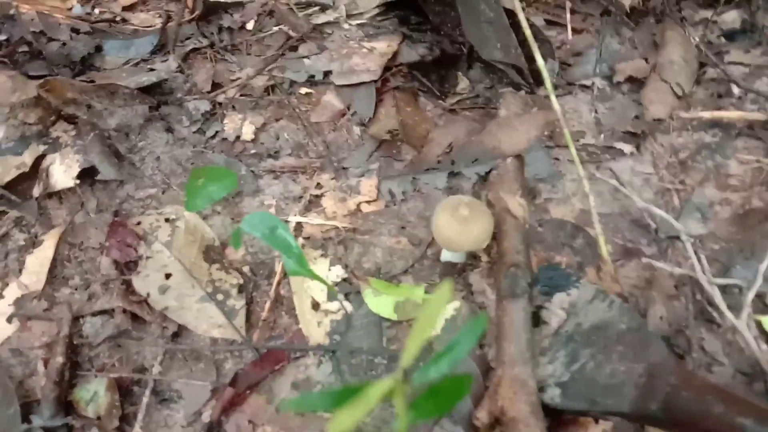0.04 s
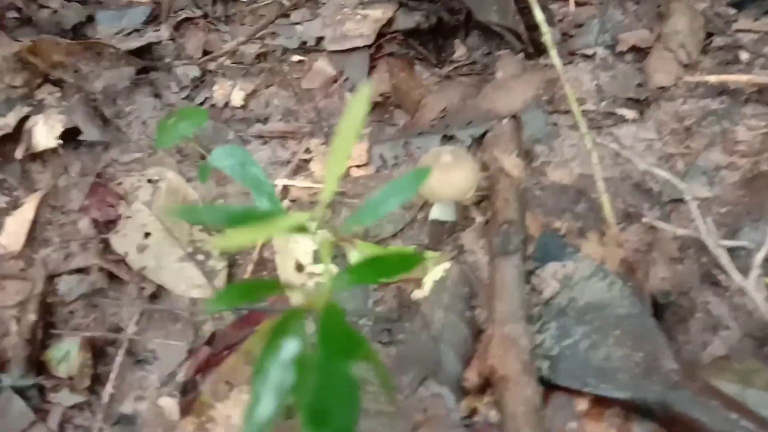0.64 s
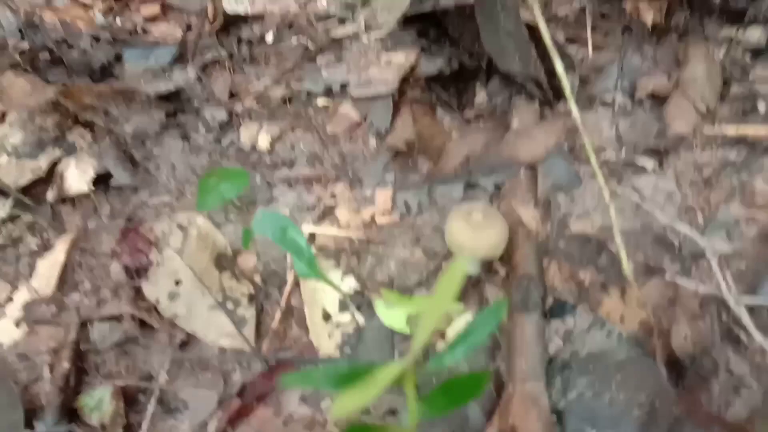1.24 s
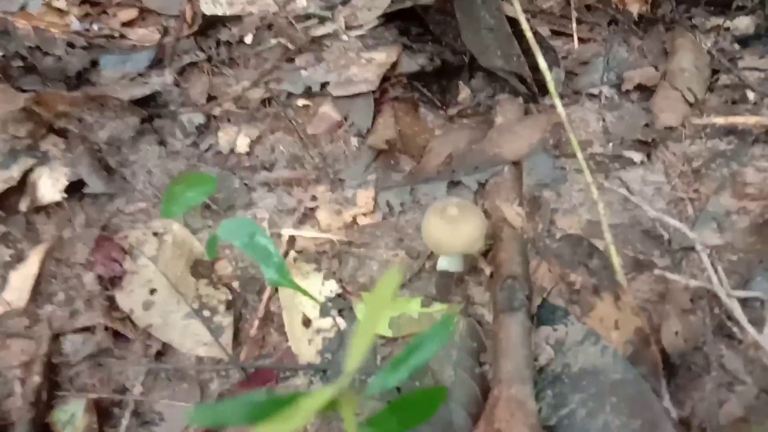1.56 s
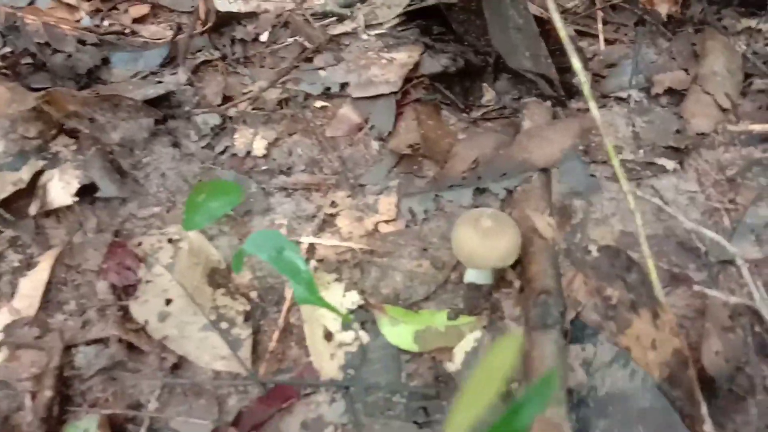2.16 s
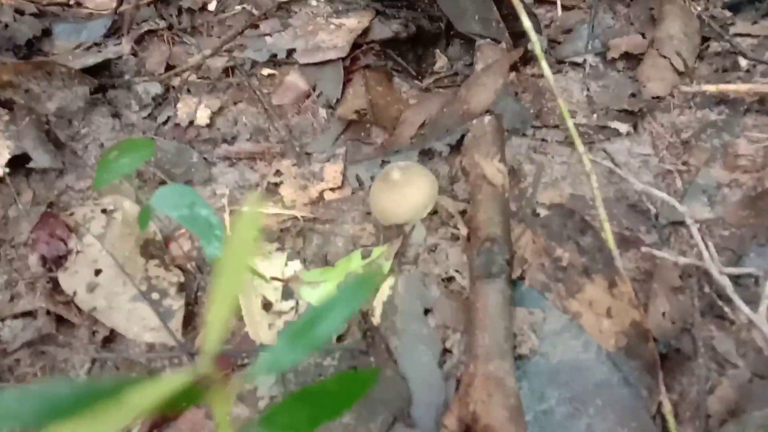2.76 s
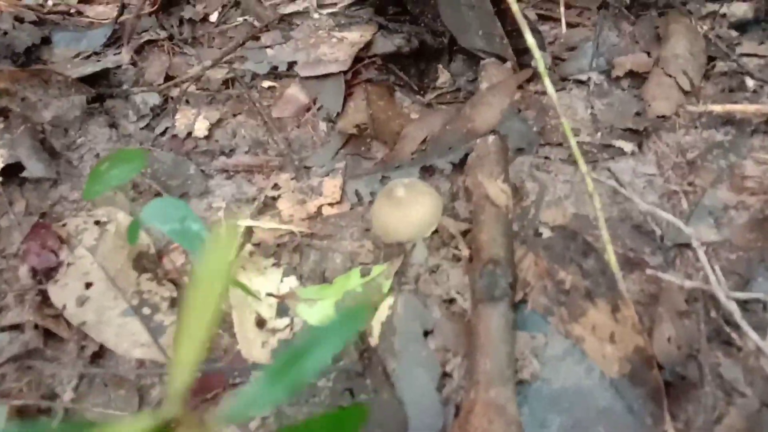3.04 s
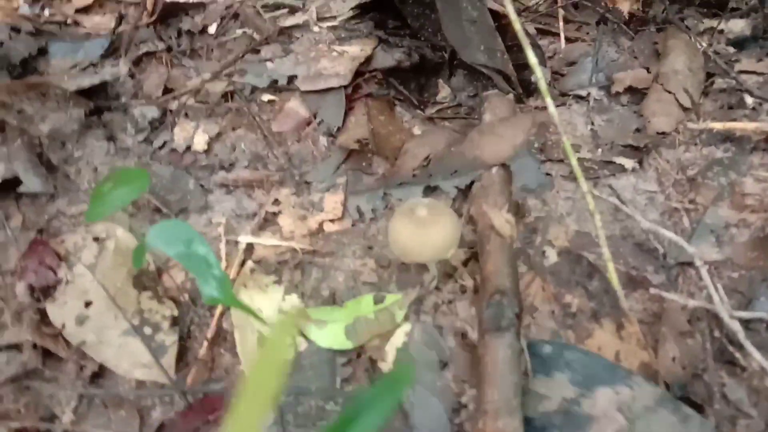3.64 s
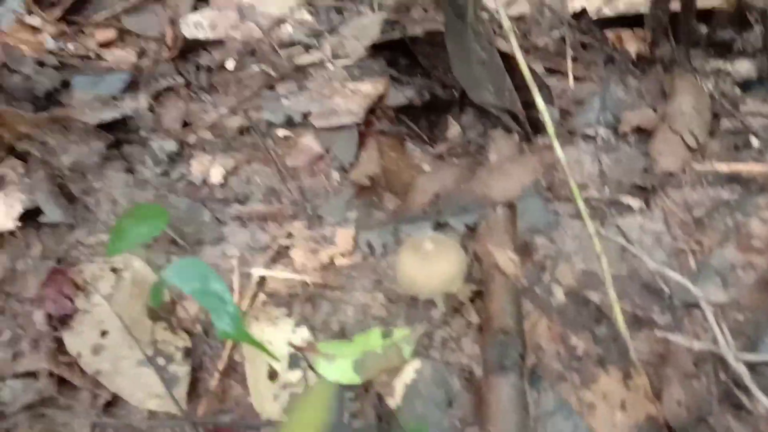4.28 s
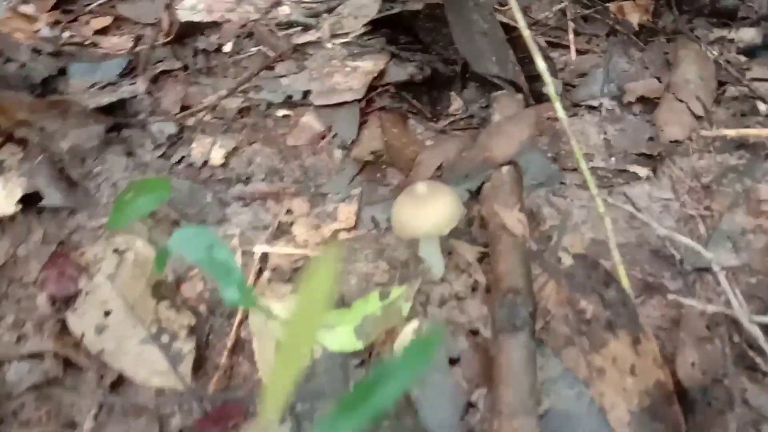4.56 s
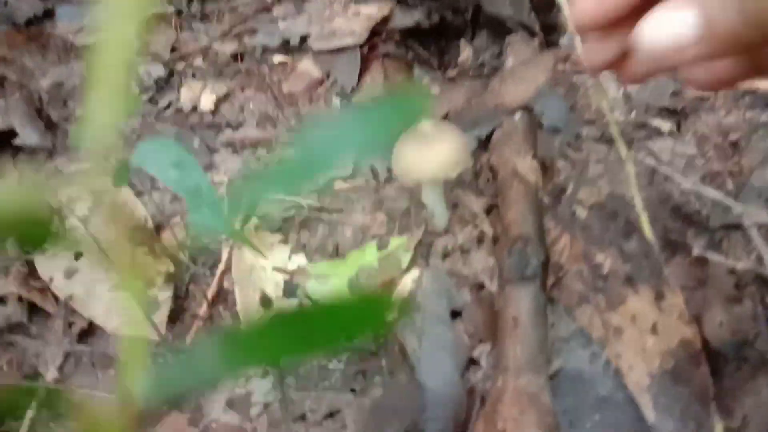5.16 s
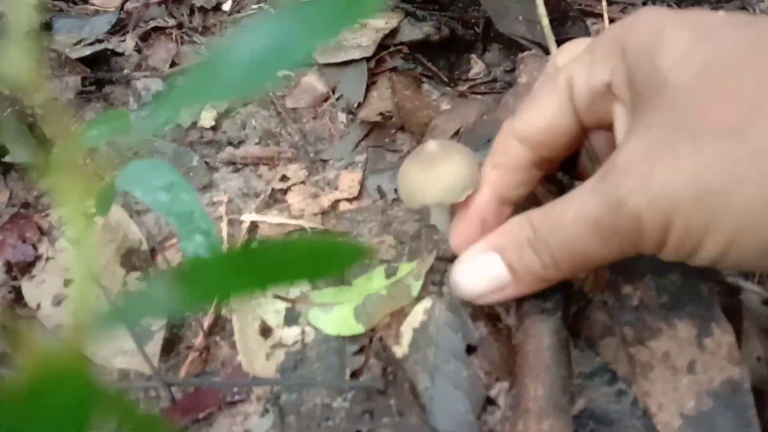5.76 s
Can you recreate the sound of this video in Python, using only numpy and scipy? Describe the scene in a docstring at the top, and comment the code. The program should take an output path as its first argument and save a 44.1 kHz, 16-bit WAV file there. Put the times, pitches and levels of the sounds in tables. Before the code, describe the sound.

Someone shifts about in dry leaves on a forest floor, close to the microphone. Light brushing alternates with short bursts of crunching, dotted with crisp snaps of small stalks and soft thuds on the soil. The sharpest snap comes after the middle, and the movement then dies down. Distant insects keep up a faint, high buzz over a low hush throughout.

```python
"""Shifting in dry leaves

Someone shifts about in leaf litter on a forest floor, close to the microphone. Friction rings the
leaves in strokes of swish and crunch, stalks snap as their fibres tear, and weight lands on the soil
with soft thuds. In the trees, the clicks of many insects blur into a steady buzz over a low, far drone."""
import sys
import numpy as np
from scipy import signal
from scipy.fft import rfft, irfft, next_fast_len
from scipy.io import wavfile
from scipy.ndimage import uniform_filter1d, map_coordinates

SR = 44100
rng = np.random.default_rng(int(sys.argv[2]) if len(sys.argv) > 2 else 0)


def transcribe(signal):
    """Save signal, clipped to [-1, 1], as a 16-bit WAV file at the path in sys.argv[1]."""
    frames = np.atleast_2d(signal).T
    limited = np.clip(frames, -1, 1)
    pcm = np.round(limited * 32767).astype(np.int16)
    wavfile.write(sys.argv[1], SR, pcm)


N = 265515
TIME = np.arange(N) / SR


def from_db(db):
    """Decibels to gain."""
    return 10 ** (np.asarray(db) / 20)


def rms_one(x):
    """Scale to an rms of 1."""
    return x / np.sqrt(np.mean(x ** 2) + 1e-20)


def band(x, low_hz, high_hz, order=2):
    """Butterworth band-pass."""
    sos = signal.butter(order, [low_hz, high_hz], "band", fs=SR, output="sos")
    return signal.sosfilt(sos, x + 1e-18)


def resonate(x, hz, width_hz):
    """Two identical resonators in series, with unity gain at the peak."""
    r = np.exp(-np.pi * width_hz / SR)
    b = np.array([1, 0, -1]) * (1 - r * r) / 2
    a = [1, -2 * r * np.cos(2 * np.pi * hz / SR), r * r]
    return signal.lfilter(b, a, signal.lfilter(b, a, x + 1e-18) + 1e-18)


def colour(x, curve):
    """Minimum-phase EQ along the given curve."""
    size = 2 * next_fast_len(N // 2 + SR // 8)
    hz, db = np.transpose(curve)
    bin_hz = np.arange(size // 2 + 1) * SR / size
    gain = from_db(np.interp(np.log(bin_hz + 1), np.log(hz), db))
    cepstrum = irfft(np.log(gain))
    cepstrum[1:size // 2] *= 2
    cepstrum[size // 2 + 1:] = 0
    return irfft(rfft(x, size) * np.exp(rfft(cepstrum)))[:N]


def drift(per_s):
    """Smooth random modulation with an rms of 1."""
    knots = rng.standard_normal(4096)
    return rms_one(map_coordinates(knots, [TIME * per_s], order=3, mode="wrap"))


def grains(per_s, spread_db):
    """Random clicks, mostly small and a few large; the power stays near 1 as the rate varies."""
    sizes = from_db(spread_db * np.minimum(rng.exponential(1, N), 4.5)) * rng.choice([-1, 1], N)
    return rms_one(sizes * (rng.random(N) < per_s / SR) / np.sqrt(per_s))


# EQ of still forest air: (frequency [Hz], gain [dB])
HUSH_EQ = [(20, -10.5), (38, -13.5), (65, 5), (110, 4.5), (200, 1.5), (300, -7), (600, -13.5), (1000, -17),
           (1900, -29), (3200, -24.5), (6000, -23.5), (9000, -18), (16000, -25.5)]


def forest_air(drone_hz=89.7):
    """The bed: a soft hush and a low, far drone that swells unevenly."""
    hush = from_db(-61.5 + 1.16 * drift(9)) * rms_one(colour(rng.standard_normal(N), HUSH_EQ))
    drone = np.sin(2 * np.pi * np.cumsum(drone_hz + 2.72 * drift(18)) / SR)
    rumble = rms_one(band(rng.standard_normal(N), 81.4, 97.0))
    return hush + from_db(-64.5 + 5.2 * drift(13)) * drone + from_db(-65) * rumble


# EQ of the faint stereo noise: (frequency [Hz], gain [dB])
WIDTH_EQ = [(30, 3), (100, -3), (220, 1), (500, -0.5), (1000, -3), (2000, -13.5), (4000, -10.5),
            (6000, -19.5), (9000, -5), (15000, -14)]


def width_noise():
    """Faint noise, opposite in polarity left and right, adds stereo width."""
    noise = from_db(-80.5) * rms_one(colour(rng.standard_normal(N), WIDTH_EQ))
    return np.array([noise, -noise])


# Fader of the far chorus: (time [s], level [dB])
CHORUS_FADER = [(0, -58.5), (1.3, -60.5), (2.1, -54), (3.0, -59.5), (4.4, -58), (5.2, -63), (6.02, -66.5)]
# Nearer insects swelling out of it: (peak time [s], level [dB])
INSECT_SWELLS = [(.0, -56), (.11, -55.5), (.39, -62), (.67, -58), (1.18, -59.5), (1.51, -58.5),
                 (2.61, -57.5), (2.8, -57.5), (3.78, -60), (4.0, -58.5), (4.75, -57.5), (5.011, -60.5),
                 (5.34, -58), (5.64, -63.5), (6.01, -60)]
# Resonances of the insects: (frequency [Hz], width [Hz], gain [dB])
INSECT_MODES = [(4533, 410, 5.5), (4880, 340, -2), (5380, 400, -8), (5500, 600, -19.5), (4100, 270, -22),
                (7100, 900, -27)]


def insects(attack_s=.045, release_s=.11, pitch_rise_per_db=.0013):
    """Many far insects click their sound organs; the blurred buzz rises in pitch as it swells."""
    chorus_db = np.interp(TIME, *np.transpose(CHORUS_FADER))
    power = from_db(chorus_db) ** 2
    for s, db in INSECT_SWELLS:
        fade = np.maximum((s - TIME) / attack_s, (TIME - s) / release_s)
        power += (from_db(db) * np.exp(-np.minimum(fade ** 2, 20))) ** 2
    level_db = 10 * np.log10(power)
    buzz = 0
    for hz, width_hz, db in INSECT_MODES:
        voice = rms_one(resonate(grains(3000, spread_db=0.5), hz, width_hz))
        buzz += from_db(db + 3 * drift(22)) * voice
    lift_db = level_db - chorus_db
    glide = np.cumsum(pitch_rise_per_db * (lift_db - lift_db.mean()) + .009 * drift(20))
    bent = map_coordinates(buzz, [np.arange(N) + glide], order=3, mode="mirror")
    return from_db(level_db - 2.5) * rms_one(bent)


def push_envelope(s, hold_s, attack_s, release_s=.032, range_db=20):
    """One push gains range_db over its attack, holds, and loses as much over its release."""
    away = np.maximum(s - TIME, 0) / attack_s + np.maximum(TIME - s - hold_s, 0) / release_s
    return from_db(-range_db * np.minimum(away ** 2, 10))


# Light brushes over the leaves: (peak time [s], level [dB], length [s], relative crisp top [dB])
LIGHT_GRAZES = [(.15, -59.5, .36, -17), (0.536, -65, 0.26, -16), (1.204, -72, 0.23, -16),
                (1.477, -67, 0.24, -13), (1.694, -56.5, 0.27, -8.5), (2.188, -59, 0.14, -8),
                (2.542, -58, .08, -20), (2.726, -62, 0.3, -14.5), (3.282, -63, 0.1, -18),
                (3.755, -68.5, 0.18, -10), (3.973, -65, 0.11, -16), (4.547, -59.5, 0.11, -24),
                (4.68, -59.5, .1, -29), (5.346, -78, 0.091, -16)]
# Weight pressing into the litter:
# (peak time [s], hold [s], level [dB], attack [s], relative crunch [dB], relative crisp top [dB])
WEIGHT_PUSHES = [(0.0, 0.0044, -50.5, .055, -10.5, -11), (0.871, 0.053, -46.5, 0.088, -9, -6),
                 (1.025, 0.016, -39, 0.057, -7.5, -8.5), (1.851, 0.023, -43.5, 0.048, -22, -10.5),
                 (1.915, 0.025, -46.5, 0.056, -8, -2), (2.002, 0.029, -39, 0.03, -7.5, -7),
                 (2.28, 0.048, -51, 0.046, -2.5, -13.5), (2.445, 0.052, -48.5, .12, -5, -12.5),
                 (3.062, 0.048, -61.5, 0.033, -6, -15), (3.18, 0.071, -58.5, 0.028, -5.5, -11),
                 (3.337, 0.012, -49, 0.026, -9, -11.5), (3.42, 0.088, -46, 0.065, -13.5, -11.5),
                 (3.54, .028, -46, 0.037, -10.5, -5), (3.662, .014, -35, 0.052, -9.5, -10),
                 (3.91, 0.02, -55, 0.05, -1.5, -8), (4.163, 0.16, -49.5, .085, -10, -5),
                 (4.469, 0.031, -48.5, 0.12, -7, -13.5)]


def movement(resting_db=-81.5, light_crunch_db=-10, crunch_lag_s=.0061):
    """Grazes and pushes add their power to the restless litter: dB faders for swish, crunch and crisp."""
    def band_gains(db, crunch_db, crisp_db):
        return from_db(db + np.array([[0], [crunch_db], [crisp_db]]))

    power = np.zeros((3, N)) + band_gains(resting_db, light_crunch_db, crisp_db=-16) ** 2
    for s, db, length_s, crisp_db in LIGHT_GRAZES:
        swell = np.exp(-np.minimum((2 * (TIME - s) / length_s) ** 2, 20))
        power += (band_gains(db, light_crunch_db, crisp_db) * swell) ** 2
    for s, hold_s, db, attack_s, crunch_db, crisp_db in WEIGHT_PUSHES:
        top = push_envelope(s, hold_s, attack_s)
        # deep layers give way later, and only under full weight
        deep = push_envelope(s + crunch_lag_s, hold_s, attack_s) ** 1.18
        # bent leaves creep back in a quiet tail
        settle = from_db(-30.5) * push_envelope(s, hold_s, attack_s, release_s=.15)
        band_power = np.array([top ** 2 + settle ** 2, deep ** 2 + settle ** 2, top ** 2])
        power += band_gains(db, crunch_db, crisp_db) ** 2 * band_power
    return 10 * np.log10(power)


def leaf_rings(friction, modes, bend_db=5.8, bends_per_s=24):
    """Friction rings the leaves' resonances; each comes and goes as the leaves bend."""
    total = 0
    for hz, width_hz, db in modes:
        ring = rms_one(resonate(friction, hz, width_hz))
        bend = 2 * np.tanh(drift(bends_per_s) / 2)
        total += from_db(db + bend_db * bend) * ring
    # the resonances share one supply of energy: the colour shifts while the loudness holds
    return total / np.sqrt(uniform_filter1d(total ** 2, size=700) + 1e-9)


def ground_bounce(x):
    """The ground returns a copy a moment later; the hollow colour shifts as the leaves move."""
    delay_s = .00236 * (1 + 0.024 * drift(7))
    return x + 0.2 * map_coordinates(x, [(TIME - delay_s) * SR], order=3)


# EQ of scraping leaves: (frequency [Hz], gain [dB])
SCRAPE_EQ = [(150, 5.5), (400, -6), (720, -12), (1200, -4), (1800, -7), (2600, 5.5), (4000, 7), (6000, 4),
             (9000, -18.5), (16000, -12)]
# Resonances of loose, lightly grazed leaves: (frequency [Hz], width [Hz], gain [dB])
LOOSE_MODES = [(1810, 490, -8), (2445, 270, -3.5), (2776, 410, -5.5), (3280, 1400, 0), (5070, 820, 4),
               (5930, 390, -8), (7220, 270, 4.5), (7650, 240, 4)]
# Resonances of the pressed heap: (frequency [Hz], width [Hz], gain [dB])
HEAP_MODES = [(482, 370, -14.5), (1042, 280, -12), (2105, 500, -7.5), (2536, 160, -18), (3400, 320, -7.5),
              (4020, 770, 4.5), (4580, 430, 5.5), (5516, 140, 3.5), (6800, 210, 1)]


def rustle(swish_db, crunch_db, crisp_db):
    """Leaves graze each other softly when barely moved, and crackle in a dense swish when pressed."""
    pressure = np.clip((swish_db + 55.5) / 8, 0, 1)
    slips_per_s = np.clip(2600 * from_db(.6 * (swish_db + 50)), 300, 14000)
    slips = grains(slips_per_s, spread_db=3.5)
    friction = rms_one(slips + 0.58 * rng.standard_normal(N))
    grazed = 0.76 * np.sqrt(1 - pressure) * leaf_rings(friction, LOOSE_MODES)
    pressed = 0.58 * np.sqrt(pressure) * leaf_rings(friction, HEAP_MODES)
    leaves = rms_one(colour(friction, SCRAPE_EQ)) + grazed + pressed
    swish = from_db(swish_db + 2.5) * rms_one(band(leaves, 1530, 8200, order=3))
    crunch = from_db(crunch_db - 3) * rms_one(band(leaves, 314, 1447, order=3))
    crackle = friction + 0.33 * grains(slips_per_s / 3, spread_db=5)
    crisp = from_db(crisp_db + 16) * rms_one(band(crackle, 6730, 15000, order=4))
    flutter = from_db(1.12 * drift(90) + 0.77 * drift(25))
    return ground_bounce(flutter * (swish + crunch + crisp))


# Low bumps, soft rubs and two high chirps: (peak time [s], level [dB], pitch [Hz], length [s])
NOISE_SWELLS = [(0.202, -55.5, 168, 0.054), (0.403, -61, 137, 0.085), (0.8, -52.5, 3220, 0.05),
                (2.812, -66.5, 1640, 0.018), (3.07, -49, 8100, 0.037), (3.182, -47, 8400, 0.04),
                (3.797, -68.5, 1140, 0.039), (4.179, -53, 1150, 0.022), (4.33, -58, 200, 0.22),
                (4.68, -62, 183, 0.1), (4.93, -70.5, 1000, 0.16)]


def bumps_rubs_chirps():
    """Short swells of narrow-band noise: low bumps, soft rubs and two high chirps."""
    out = np.zeros(N)
    for s, level_db, hz, length_s in NOISE_SWELLS:
        swell = np.exp(-(2 * (TIME - s) / length_s) ** 2)
        noise = rms_one(band(grains(3000, spread_db=1), hz / 1.25, hz * 1.19))
        out += from_db(level_db) * swell * noise
    return out


def cracks(rows, size=2048):
    """Each break is a sharp click and a run of tearing fibres; the leaf rings, the litter scatters it."""
    out, t = np.zeros(N + size), np.arange(size) / SR
    for s, level_db, hz, knock_db, crisp_db, tear_s in rows:
        fibres, scatter = rng.standard_normal((2, size))
        crack = 0.38 * fibres * np.exp(-t / tear_s) + 0.043 * scatter * np.exp(-t / 0.0046)
        crack[0] += 1
        leaf = rms_one(resonate(crack, hz, width_hz=0.55 * hz) + 0.39 * band(crack, 2540, 7500))
        knock = from_db(knock_db - 10) * rms_one(band(crack, 565, 1640))
        crisp = from_db(crisp_db + 12.5) * rms_one(band(crack, 8200, 14300, order=3))
        at = int(s * SR)
        out[at:at + size] += from_db(level_db - 12) * (leaf + knock + crisp)
    return out[:N]


# Leaves and stalks breaking:
# (time [s], level [dB], leaf pitch [Hz], woody knock trim [dB], crisp top trim [dB], tear decay [s])
STALK_SNAPS = [(0.2138, -49, 5000, -19, -29, 0.00068), (0.2267, -47.5, 4370, 0, -29, .0004),
               (0.341, -53, 2650, -24, -29, .0008), (0.4829, -52, 3600, -29, -32, 0.001),
               (0.5202, -50.5, 3730, -36, -38, 0.00071), (1.034, -27.5, 5000, -18, -25, 0.00083),
               (1.4725, -49.5, 4700, -26, -8, 0.00095), (1.621, -44.5, 4070, -24, -30, 0.00036),
               (1.667, -36.5, 4200, 0, -17, 0.0021), (1.803, -36, 4940, -26, -2.5, 0.0011),
               (1.8086, -35.5, 5430, -19, -16, 0.00021), (1.84, -32, 4130, -21, -12, 0.0024),
               (1.981, -37, 4520, -19, -6, 0.0026), (2.0164, -27.5, 4580, -11, -2.5, 0.0019),
               (2.1531, -38, 3440, -9, -19, 0.00082), (2.174, -40, 5060, -23, -28, 0.00045),
               (2.2494, -38, 5100, -24, -6.5, .0016), (2.2872, -43, 4330, 6, -21, 0.00034),
               (2.3544, -34, 5700, -35, -9.5, 0.0029), (2.4357, -29, 4140, -5, -18, .0015),
               (2.4625, -29, 4200, 5, -14.5, 0.00064), (2.7141, -30, 4300, -4, -32, 0.00028),
               (2.9846, -45.5, 2390, -24, -14, .0014), (3.0987, -46.5, 4670, -6, -11, 0.00057),
               (3.2374, -30.5, 4000, -1, -18, 0.0021), (3.2525, -43, 4960, -4, -30, 0.0013),
               (3.3392, -30.5, 3570, -10, -22, .0018), (3.6433, -29, 5050, -34, -20, .0019),
               (3.8928, -39, 5530, -5, -25, 0.003), (3.9217, -35, 5200, 2, -13, 0.0018),
               (4.0839, -46.5, 3060, -28, -4, 0.0016), (4.141, -33.5, 6000, -28, -7, .0008),
               (4.2105, -38, 5100, -32, -10, .0008), (4.2648, -19, 5200, -4.5, -11.5, .0022),
               (4.3773, -31.5, 4200, -6.5, -28, .00065), (4.4023, -39.5, 4270, 0, -24, 0.0046),
               (4.7089, -47.5, 4000, -5, -32, .0007), (5.351, -57.5, 4370, -15, -21, .003)]


def snaps(lead_s=.007, first_fibre_db=-19):
    """Stalks and leaves snap, each just after the small crack of its first fibre."""
    first_fibres = [(s - lead_s, db + first_fibre_db, *tone) for s, db, *tone in STALK_SNAPS]
    return cracks(STALK_SNAPS + first_fibres)


def ticks(swish_db, per_s=14, candidates=300):
    """Tiny random snaps whose level follows the movement that causes them."""
    position, chance = rng.random((candidates, 2)).T
    pitch, knock, crisp, tear = rng.standard_normal((4, candidates))
    s = position * TIME[-1]
    level_db = -45 + 0.79 * (np.interp(s, TIME, swish_db) + 49)
    hz = 4040 * 2 ** (0.2 * pitch)
    knock_db, crisp_db = -24 + 8 * knock, -22 + 7 * crisp
    tear_s = .00096 * 2 ** (0.65 * tear)
    rows = np.column_stack([s, level_db, hz, knock_db, crisp_db, tear_s])
    return cracks(rows[chance < per_s * TIME[-1] / candidates])


# Dull thuds on soil and knocks on damp sticks: (time [s], level [dB], pitch [Hz], 60 dB decay [s])
SOIL_THUDS = [(0.414, -64.5, 800, 0.11), (1.0463, -40.5, 241, 0.067), (1.667, -44.5, 295, 0.011),
              (2.037, -35.5, 130, 0.086), (2.0614, -36, 89, 0.049), (2.372, -37, 346, 0.0097),
              (2.4347, -34.5, 190, 0.021), (2.463, -37.5, 326, 0.012), (2.859, -55, 940, 0.026),
              (3.677, -29.5, 178, 0.038), (3.9234, -27, 470, 0.012), (3.93, -49, 149, 0.14),
              (4.271, -44, 104, 0.081), (5.958, -67, 1165, 0.054)]


def thuds(size=8192):
    """The ground gives a short damped bounce while the packed litter settles on it."""
    out, t = np.zeros(N + size), np.arange(size) / SR
    for s, level_db, hz, t60 in SOIL_THUDS:
        bounce = np.sin(2 * np.pi * hz * t)
        settling = rms_one(band(rng.standard_normal(size), hz / 2, hz * 2))
        attack = 1 - np.exp(-t * hz / 0.22)
        decay = from_db(level_db + 7.5 - 60 * t / t60)
        at = int(s * SR)
        out[at:at + size] += attack * decay * (bounce + 0.5 * settling)
    return band(out[:N], 55, 2700)


def tree_echo(x, t60_s=1.04, predelay_s=.008):
    """A dull reverb tail scattered back by the trunks."""
    t = TIME[:SR // 2]
    returns = rng.standard_normal(len(t)) * from_db(-60 * t / t60_s) * (t > predelay_s)
    tail = signal.fftconvolve(x, returns / np.linalg.norm(returns))[:N]
    return band(tail, 130, 1800, order=1)


def scene():
    """Leaves and forest sit in the centre; only the echo and a faint noise give stereo width."""
    swish_db, crunch_db, crisp_db = movement()
    litter = rustle(swish_db, crunch_db, crisp_db) + snaps() + thuds()
    centre = litter + bumps_rubs_chirps() + insects() + forest_air()
    sides = width_noise()
    echo = from_db(-37) * np.array([tree_echo(centre), tree_echo(centre)])
    return centre + sides + echo + ticks(swish_db)


# Response of the microphone and its port: (frequency [Hz], gain [dB])
MIC_EQ = [(720, -2), (930, 1.5), (1100, 1), (1250, 12.5), (1400, 5.5), (2100, 5), (3200, 3), (4600, 3),
          (5750, 5), (6280, 1), (6600, -8.5), (7150, -6.5), (8000, -16.5), (13700, -18.5), (15200, -1)]


def record(dry):
    """The microphone port colours the mix, and a steep low-pass takes off the very top."""
    stopband_hz = 16450
    low_pass = signal.cheby2(20, 70, stopband_hz, fs=SR, output="sos")
    return signal.sosfilt(low_pass, [colour(channel, MIC_EQ) for channel in dry])


dry = scene()
out = record(dry)
transcribe(out)
```